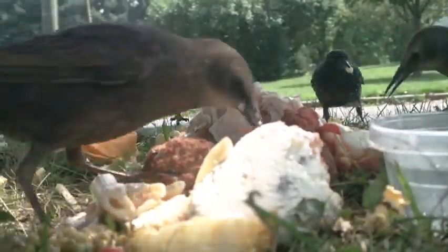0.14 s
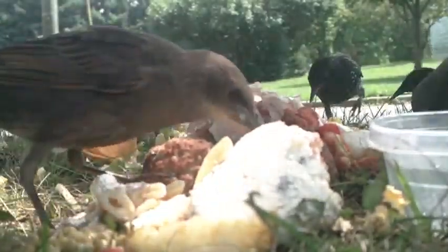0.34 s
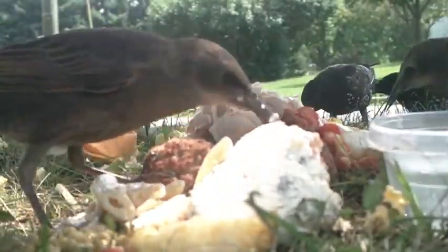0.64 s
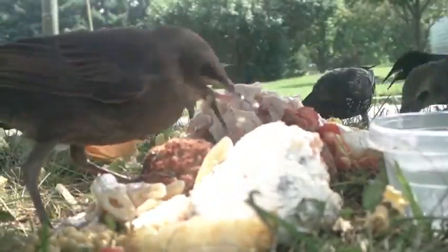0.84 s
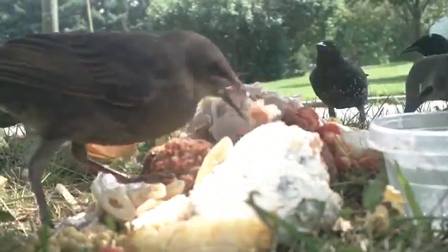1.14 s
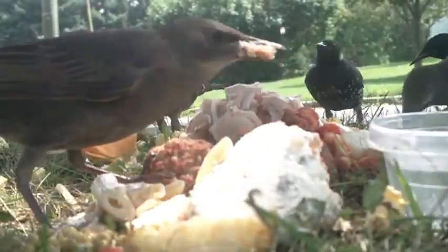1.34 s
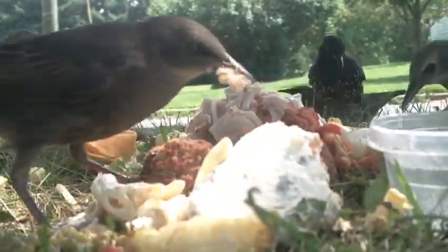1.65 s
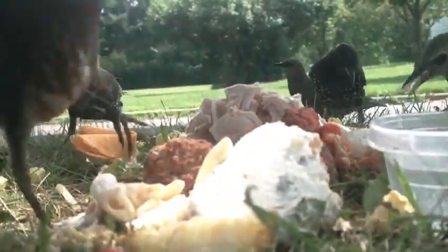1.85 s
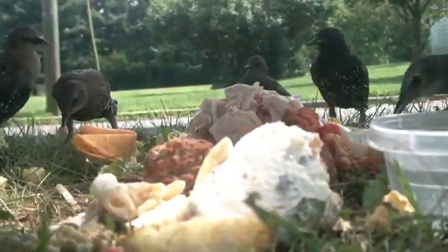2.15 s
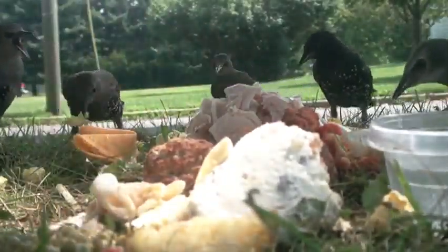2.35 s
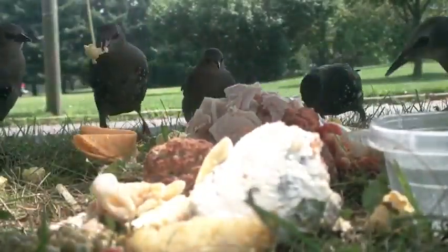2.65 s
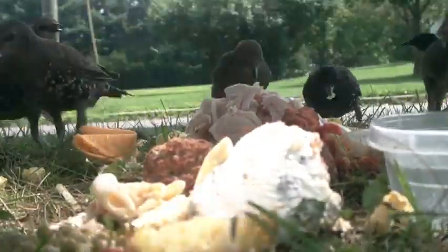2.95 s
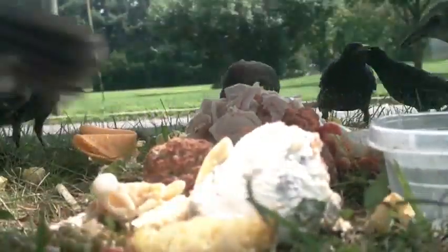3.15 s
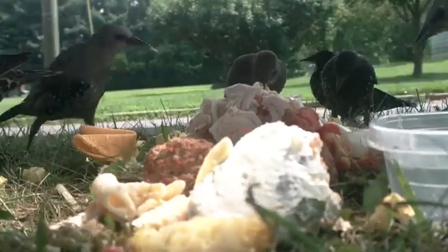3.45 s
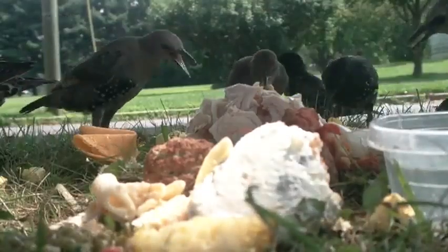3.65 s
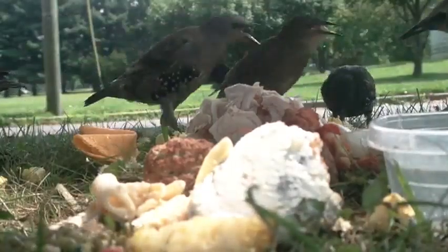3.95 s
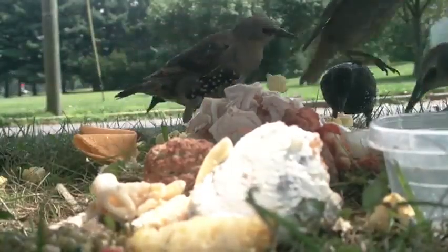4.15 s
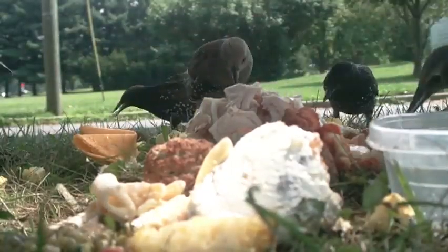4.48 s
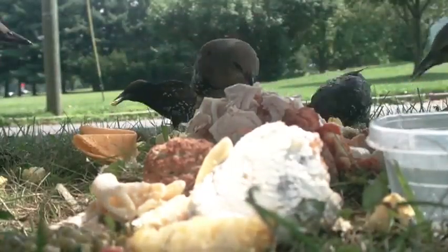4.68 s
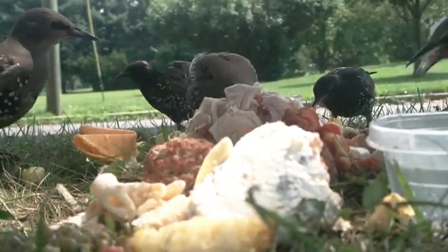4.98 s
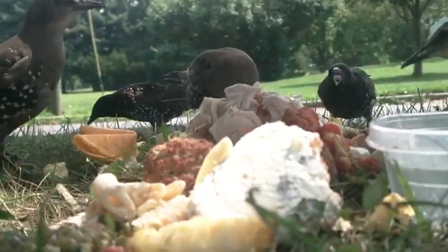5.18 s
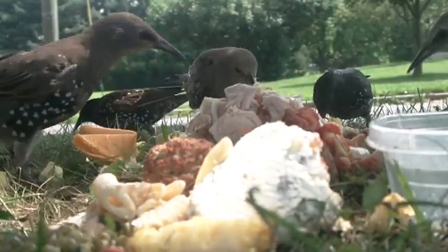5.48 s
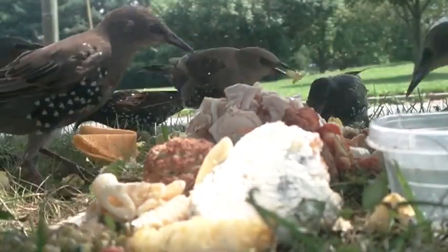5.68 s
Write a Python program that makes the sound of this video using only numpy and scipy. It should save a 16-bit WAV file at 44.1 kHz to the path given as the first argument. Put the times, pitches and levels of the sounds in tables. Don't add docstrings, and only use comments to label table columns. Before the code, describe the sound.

Outdoors on a lawn, low distant traffic rumbles softly. A beak snaps, then wings rustle and push low air thuds onto the close stereo microphone. Around two seconds nearby starlings burst into piercing rough shrieks with hard clicks; wings thump in a take-off, another squabble with a beak rattle follows, then only duller distant churrs and thin whistles remain.

```python
import sys
import numpy as np
from scipy import signal
from scipy.fft import rfft, irfft, next_fast_len
from scipy.io import wavfile
from scipy.ndimage import uniform_filter1d

SR = 44100
rng = np.random.default_rng(int(sys.argv[2]) if len(sys.argv) > 2 else 0)


def magnitude_from_level(level_db):
    exponent = np.asarray(level_db, float) / 20
    return 10 ** exponent


def materialize(psi):
    bounded = np.clip(np.atleast_2d(psi).T, -1, 1)
    quanta = np.round(bounded * 32767).astype(np.int16)
    wavfile.write(sys.argv[1], SR, quanta)


N = 256662


def rms_one(x):
    return x / np.sqrt(np.mean(x ** 2) + 1e-20)


def at_hz(points, hz):
    points_hz, value = np.transpose(points)
    return np.interp(np.log(np.maximum(hz, 1)), np.log(points_hz), value)


def butter(x, hz, kind, order=2):
    return signal.sosfilt(signal.butter(order, hz, kind, fs=SR, output="sos"), x)


def drift(hz, size=N):
    settle = 20000
    return rms_one(butter(rng.standard_normal(size + settle), hz, "low")[settle:])


def pan(x, db):
    return np.array([x * magnitude_from_level(db / 2), x * magnitude_from_level(-db / 2)])


def add(out, part, s):
    i = int(s * SR)
    out[:, i:i + part.shape[1]] += part[:, :N - i]


# pitch_hz, density_db (dB per Hz)
GROUND_SPECTRUM = [(12, -30), (20, -3.5), (44, 2.5), (158, -10.5), (221, -15.5), (317, -16), (345, -20),
                   (916, -29.5), (1740, -33), (5320, -36.5), (14100, -36.5), (15800, -40)]
# pitch_hz, likeness (-1 to 1)
PORT_LIKENESS = [(60, 0.87), (180, 0.88), (550, 0.64), (1650, 0.57), (4970, -0.17), (15000, -0.32)]


def ground(level_db=-36, patchy_db=1.2):
    out, together = 0, drift(0.57)
    edges = 18 * 2 ** np.arange(0, 10.1, .5)
    settle = 8000
    white = rng.standard_normal((2, 2, N + settle))
    for k, (low, high) in enumerate(zip(edges, edges[1:])):
        mid, side = butter(white[k % 2], [low, high], "band")[:, settle:]
        hz = np.sqrt(low * high)
        alike = np.clip(at_hz(PORT_LIKENESS, hz), -1, 1)
        gain = magnitude_from_level(at_hz(GROUND_SPECTRUM, hz) + patchy_db * (.3 * together + drift(9)))
        stereo = np.sqrt(1 + alike) * mid + np.sqrt(1 - alike) * side * [[1], [-1]]
        out = out + gain * stereo
    return magnitude_from_level(level_db) * pan(0.98, 0.85)[:, None] * rms_one(out)


# start_s, level_db, length_s, brightness_db (dB per octave)
SWISHES = [(0.716, -46.5, 0.016, 0.5), (0.956, -45, 0.017, 4.5), (1.032, -43.5, 0.03, 5),
           (1.25, -46, 0.16, -3.5), (1.746, -41.5, 0.02, 9), (1.995, -48.5, 0.097, -3.5),
           (2.365, -31.5, 0.01, -1.5), (2.74, -45.5, 0.01, 1), (2.922, -30.5, 0.018, -0.2),
           (3.183, -44.5, 0.043, -2), (2.964, -33.5, 0.028, -4.5), (3.055, -42.5, 0.14, 0),
           (1.221, -53.5, 0.25, -3), (3.691, -33, 0.021, -2.5), (4.007, -46, 0.027, -3),
           (5.066, -51.5, 0.08, -1), (5.736, -46, 0.084, -3.5)]
# start_s, beat_s, level_db, change_db (per beat), brightness_db (dB per octave)
FLUTTERS = [
    (1.133, .06, -43, .3, -13),
    (2.985, .039, -37, -1.34, -2.5),
]


def feathers():
    out, n = np.zeros((2, N)), 32768
    beats = [(s + beat_s * k, level_db + change_db * k, .016, tilt_db)
             for s, beat_s, level_db, change_db, tilt_db in FLUTTERS for k in range(5)]
    for s, level_db, length_s, tilt_db in SWISHES + beats:
        t = np.arange(n) / SR - 2 * length_s
        noise = rng.standard_normal((3, n)) * magnitude_from_level(3.7 * drift(170, size=n))
        hz = np.arange(n // 2 + 1) * SR / n + 1
        colour = magnitude_from_level(tilt_db * np.log2(hz / 4000)) / (1 + (250 / hz) ** 3)
        both_ports = 2.7 * noise[0] + noise[1:]
        burst = rms_one(irfft(rfft(both_ports) * colour, n))
        swell = np.exp(-(t / (.7 * length_s)) ** 2)
        add(out, burst * magnitude_from_level(level_db) * swell, s - 2 * length_s)
    return out


# centre_s, half_width_s, low_buffet_db, upper_buffet_db (above the low), pan_db (L-R)
GUSTS = [(1.0, 0.13, -30.5, -29, -1), (1.27, 0.14, -26, -10.5, 1), (1.721, .035, -12.5, .6, 2),
         (1.8, .07, -13, 1.2, 2.5), (1.927, 0.022, -19.5, -6, 9), (2.084, 0.067, -23.5, -33, 4.5),
         (2.6, 0.28, -44, -18, -3), (2.96, 0.035, -32.5, -7, 1), (3.06, 0.073, -25.5, -21, 0),
         (3.136, 0.023, -23.5, 3, 4), (3.19, 0.046, -23.5, -32, -4)]


def gusts():
    out, t = np.zeros((2, N)), np.arange(N) / SR
    lumps = magnitude_from_level(3 * np.array([drift(30), drift(22)]))
    noise = rng.standard_normal((2, 2, N)) * lumps
    low = rms_one(butter(noise[0], [22, 95], "band"))
    upper = rms_one(butter(butter(noise[1], [110, 200], "band"), 434, "low", order=3))
    for s, half_width_s, low_db, upper_db, pan_db in GUSTS:
        side_s = half_width_s * np.where(t < s, .5, 1)
        gust = np.exp(-np.abs((t - s) / side_s) ** 3)
        out += pan(magnitude_from_level(low_db) * gust, pan_db) * (low + magnitude_from_level(upper_db) * upper)
    return out


def wing_pushes():
    out, t = np.zeros((2, N)), np.arange(N) / SR
    take_off_s, stroke_s, width_s = 2.921, .079, .006
    lone = (1.028, -24)
    strokes = [(take_off_s + stroke_s * k, -11 + k if k else -18) for k in range(4)]
    for s, peak_db in strokes + [lone]:
        dip = -np.exp(-((t - s) / width_s) ** 2)
        rebound = .7 * np.exp(-((t - s - 2.1 * width_s) / (1.3 * width_s)) ** 2)
        out += pan(magnitude_from_level(peak_db) * (dip + rebound), 1.5)
    return out


# pitch_hz, density_db (dB per Hz)
THROAT_SPECTRUM = [(290, -61), (500, -20), (876, -13), (1330, -19.5), (3150, -9.5), (4130, -9.5), (5430, 0),
                   (7030, -5.5), (7890, -12), (14000, -35), (15500, -27)]


def voice(warble_hz, crest_s, slope_db, cut_hz, t, hz, level_db, rough, depth):
    size = len(t)
    rough = np.clip(rough, 0, 1)
    warble = np.cos(2 * np.pi * warble_hz * (t - crest_s) + .5 * drift(40.7, size=size))
    hz = hz * (1 + np.clip(depth, 0, .18) * warble + 0.0702 * rough * drift(400, size=size))
    phase = 2 * np.pi * np.cumsum(hz) / SR
    tone, power = 0, 0
    for k in range(1, 18):
        gain_db = slope_db * np.log2(k) * 2 + 0.7 * at_hz(THROAT_SPECTRUM, k * hz)
        gain = magnitude_from_level(gain_db) * (k * hz < 16000)
        tone = tone + gain * np.sin(k * phase + 0.242 * k * k)
        power = power + gain ** 2 / 2
    tone = tone / np.sqrt(power)
    rasp = tone * drift(450, size=size)
    white = rfft(rng.standard_normal(size))
    grid_hz = np.arange(len(white)) * SR / size
    colour = magnitude_from_level(at_hz(THROAT_SPECTRUM, grid_hz)) / (1 + (grid_hz / cut_hz) ** 6)
    breath = rms_one(irfft(white * colour, size))
    throb_db = rough * (30 * np.clip(depth, 0, .14) * warble + 1.5 * drift(200, size=size))
    edge = np.clip(np.minimum(t - t[0], (t[-1] - t) / 3) / .003, 0, 1)
    cords = np.sqrt(1 - rough ** 2) * tone + 0.9 * rough * rasp
    mix = butter(cords, min(cut_hz, 20000), "low", order=4) + .5 * rough ** 2 * breath
    return mix * magnitude_from_level(throb_db) * edge * magnitude_from_level(level_db)


def note(s, length_s, first_hz, last_hz, db, cut_hz, warble_hz, depth, rough, slope_db, arch,
         rise, swell_db, hold, fade_db, roughens=0):
    t = s + np.arange(int(length_s * SR)) / SR
    share = (t - s) / length_s
    hz = first_hz * (last_hz / first_hz) ** share * (1 + arch * np.sin(np.pi * share))
    corners = np.clip([0, rise, max(rise, hold), 1], 0, 1)
    level_db = db + np.interp(share, corners, [-swell_db, 0, 0, -fade_db])
    return voice(warble_hz, s, slope_db, cut_hz, t, hz, level_db, rough + roughens * share, depth)


def sing(rows, pan_db, cut_hz, **kind):
    out = np.zeros((2, N))
    for row in rows:
        add(out, pan(note(*row, cut_hz, **kind), pan_db), row[0])
    return out


# start_s, length_s, first_hz, last_hz, level_db
WHISTLES = [
    (2.5, .16, 4200, 4000, -61),
    (4.3, .12, 4080, 4100, -62),
    (4.665, .105, 1560, 1510, -59),
    (5.262, .12, 4960, 4750, -57),
]
# start_s, length_s, first_hz, last_hz, level_db
TRILLS = [
    (1.943, .154, 2520, 2385, -45),
]
# start_s, length_s, first_hz, last_hz, level_db
PIPINGS = [
    (5.213, .068, 5230, 4990, -50),
]


def whistles():
    out = sing(WHISTLES, 3, 8000, warble_hz=60, depth=.01, rough=.3, slope_db=-27, arch=.003,
               rise=.5, swell_db=7, hold=.8, fade_db=3)
    out += sing(TRILLS, 3, 8000, warble_hz=63, depth=.14, rough=.33, slope_db=-25, arch=.07,
                rise=.9, swell_db=3, hold=.95, fade_db=.1)
    out += sing(PIPINGS, 3, 8000, warble_hz=60, depth=.002, rough=.08, slope_db=-30, arch=.002,
                rise=.7, swell_db=11, hold=.9, fade_db=3)
    return out


# start_s, length_s, first_hz, last_hz, level_db
CHURRS = [
    (2.95, 0.17, 1650, 2246, -41),
    (2.97, .15, 2900, 2870, -44),
    (3.29, .06, 2500, 2580, -51),
    (4.425, 0.2, 2230, 1940, -41),
    (5.008, .215, 1572, 2593, -39.5),
    (5.515, 0.11, 1900, 2355, -50.5),
    (5.72, 0.18, 2326, 2546, -44),
]
# start_s, length_s, first_hz, last_hz, level_db
UNDERTONES = [
    (3.168, 0.076, 694, 2360, -42),
    (3.242, 0.054, 1282, 1206, -42.5),
    (4.445, .14, 1198, 1386, -41.5),
    (5.04, .17, 1250, 1700, -41),
    (5.483, .125, 620, 1470, -41),
    (5.69, 0.048, 1016, 2410, -44),
    (5.7, .14, 1290, 1585, -48),
]


def churrs():
    out = sing(CHURRS, 3, 3600, warble_hz=60, depth=.12, rough=.72, roughens=-.15, slope_db=-13, arch=.07,
               rise=.25, swell_db=9, hold=.7, fade_db=9)
    out += sing(UNDERTONES, 3, 3600, warble_hz=60, depth=.08, rough=.68, slope_db=-3, arch=.06,
                rise=.3, swell_db=8, hold=.7, fade_db=9)
    return out


def rattle():
    snaps = []
    for k in range(-4, 5):
        uneven_s = .0013 * rng.uniform(-1, 1) * (k != 0)
        snaps.append((3.6864 + .0036 * k + uneven_s, -6 - 2.5 * abs(k) - 2 * (k % 2), 5860 - 130 * k))
    return snaps


# start_s, peak_db, centre_hz
CLICKS = [(0.1419, -9.5, 6400), (0.353, -32.5, 2000), (1.249, -45, 1500), (1.788, -34.5, 3040),
          (2.208, -26, 4630), (2.3663, -1, 6100), (2.374, -5.5, 5460), (2.4392, -7, 5070),
          (2.4412, -6, 5600), (3.315, -31, 1300), (3.378, -33.5, 1100), (2.704, -32.5, 8400),
          (2.918, -25, 5060), (3.5252, -8, 4770), (3.6005, -3, 5700), (3.9297, -8, 4460),
          (3.934, -12, 4930), (3.995, -25, 5500), (4.7775, -39, 5100), (5.348, -35, 6100),
          (5.5025, -37, 3500)]


def beak_snaps():
    out, t = np.zeros((2, N)), np.arange(300) / SR
    for s, peak_db, hz in CLICKS + rattle():
        turn = rng.random()
        snap = np.sin(2 * np.pi * (hz * t + turn)) * np.exp(-((t - .0005) / 0.00019) ** 2)
        splinter = 0.17 * rng.standard_normal(300) * np.exp(-((t - .0006) / 0.0023) ** 2)
        click = snap + butter(splinter, [2000, 12000], "band")
        add(out, pan(magnitude_from_level(peak_db + 1.5) * click, 1.4), s)
    return out


# start_s, length_s, first_hz, last_hz, level_db
CROAKS = [
    (2.905, 0.055, 786, 1723, -28),
    (3.452, 0.076, 799, 2410, -32.5),
    (3.777, .081, 723, 1406, -34),
]
# start_s, length_s, first_hz, last_hz, level_db
SQUEAKS = [
    (2.46, .035, 2240, 3140, -36),
    (3.622, 0.049, 3700, 2630, -34),
    (3.885, 0.041, 4250, 4200, -45),
    (3.955, 0.029, 1880, 2060, -39),
    (3.988, 0.0243, 2870, 2300, -35),
]
# start_s, length_s, first_hz, last_hz, level_db
SQUAWKS = [
    (2.222, 0.09, 748, 2330, -19.5),
    (2.3, .035, 1417, 2750, -19),
    (2.431, .032, 768, 2317, -16),
    (3.525, 0.067, 806, 2615, -20.5),
    (3.602, 0.041, 2260, 2830, -28),
]


def squawks():
    out = sing(CROAKS, .6, 6000, warble_hz=80, depth=.05, rough=.35, roughens=.5, slope_db=-1.3, arch=-.14,
               rise=.15, swell_db=5, hold=.45, fade_db=9)
    out += sing(SQUEAKS, .6, 9000, warble_hz=80, depth=.04, rough=.5, slope_db=-2.2, arch=.02,
                rise=.1, swell_db=2.5, hold=.3, fade_db=5)
    out += sing(SQUAWKS, .6, 20000, warble_hz=80, depth=.03, rough=.45, roughens=.4, slope_db=1.2, arch=-.05,
                rise=.25, swell_db=9, hold=.5, fade_db=8)
    return out


# time_s, pitch_hz, level_db
SCREECHES = [
    ((82, 2.6, 0.065, 1.6), [(2.228, 2096, -29), (2.25, 2300, -21), (2.275, 2900, -19.5), (2.337, 3740, -19.5), (2.343, 5080, -19), (2.35, 4030, -27), (2.357, 4100, -25), (2.363, 5560, -16)]),
    ((107, 2.401, 0.096, 0.71), [(2.369, 2610, -19), (2.388, 3960, -17), (2.402, 4620, -21), (2.423, 4870, -17.5), (2.428, 6850, -20)]),
    ((93, 2.475, .17, -1.5), [(2.44, 4800, -40), (2.452, 4900, -22), (2.464, 3810, -25.5), (2.476, 4310, -25.5), (2.498, 4150, -31.5)]),
    ((91, 3.566, .11, -0.7), [(3.55, 3200, -20), (3.57, 4700, -28), (3.596, 3500, -26), (3.604, 4120, -27), (3.613, 4720, -19), (3.622, 4860, -20), (3.629, 6260, -24)]),
    ((51, 3.956, .12, 0.2), [(3.915, 685, -30.5), (3.932, 920, -29), (3.938, 1076, -15.5), (3.952, 1690, -20), (3.968, 1750, -28.5), (3.988, 1230, -33)]),
]


def screech(warble_hz, crest_s, depth, slope_db, rows):
    s, hz, db = np.transpose(rows)
    t = np.arange(int(s[0] * SR), int(s[-1] * SR)) / SR
    share = (t - s[0]) / (s[-1] - s[0])
    hz = uniform_filter1d(np.interp(t, s, hz), size=88)
    db = uniform_filter1d(np.interp(t, s, db), size=88)
    rough = np.interp(share, [.2, .36, 1], [.9, .52, .2])
    return voice(warble_hz, crest_s, slope_db, 20000, t, hz, db, rough, depth * np.sin(np.pi * share))


def screeches():
    out = np.zeros((2, N))
    for header, rows in SCREECHES:
        add(out, pan(screech(*header, rows), .6), rows[0][0])
    return out


def birds():
    near = beak_snaps() + squawks() + screeches()
    near[0] = np.roll(near[0], 1)
    out = whistles() + churrs() + near
    dull = butter(out.mean(0), 13500, "low")
    add(out, pan(magnitude_from_level(-24.5) * dull, 1.5), .0023)
    t60_s = .25
    tail = rng.standard_normal((2, 8192)) * magnitude_from_level(-60 * np.arange(8192) / SR / t60_s)
    tail = tail / np.sqrt((tail ** 2).sum(axis=1, keepdims=True))
    add(out, magnitude_from_level(-20) * signal.fftconvolve(dull[None], tail, axes=1), .008)
    return out


def scene():
    return ground() + feathers() + gusts() + wing_pushes() + birds()


def roll_off(x):
    return signal.sosfilt(signal.butter(12, 16510, fs=SR, output="sos"), x)


def record(dry):
    gap_hz, gap_width_hz, top_hz = 7740, 310, 15900
    x = .92 * np.tanh(dry / .92)
    upper = butter(x, gap_hz, "high", order=10)
    wander = 1.8 * drift(300) + .55 * np.array([drift(200), drift(200)])
    analytic = signal.hilbert(upper, next_fast_len(N))[:, :N]
    x = butter(x, gap_hz, "low", order=10) + np.real(analytic * np.exp(1j * wander))
    b, a = signal.iirnotch(gap_hz, gap_hz / gap_width_hz, fs=SR)
    x = signal.lfilter(b, a, signal.lfilter(b, a, x))
    x = signal.sosfilt(signal.cheby2(16, 50, top_hz, fs=SR, output="sos"), x)
    return roll_off(x)


dry = scene()
out = record(dry)
materialize(out)
```